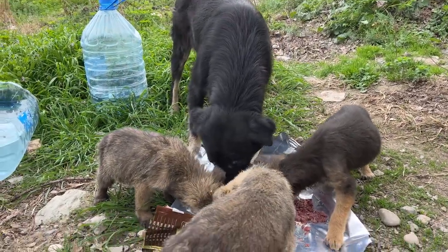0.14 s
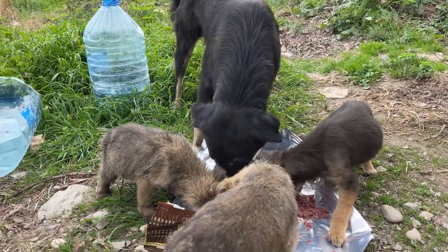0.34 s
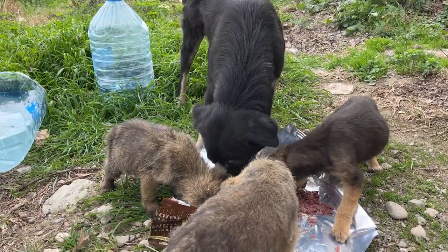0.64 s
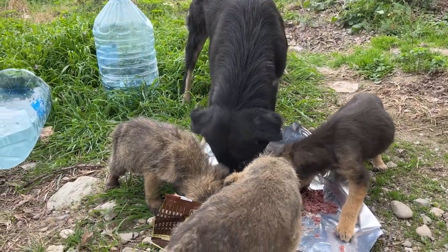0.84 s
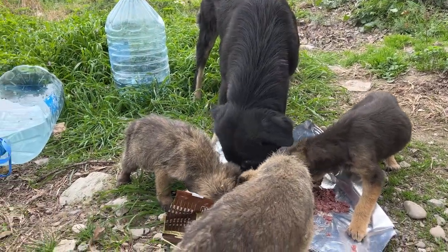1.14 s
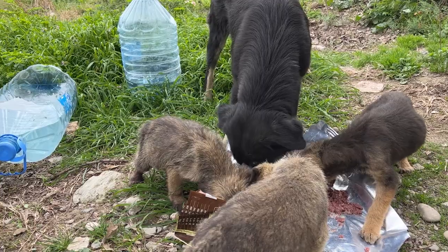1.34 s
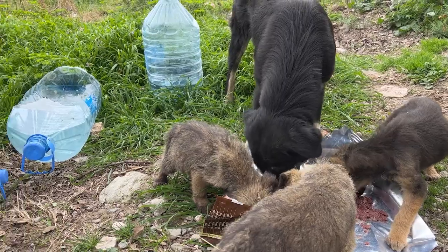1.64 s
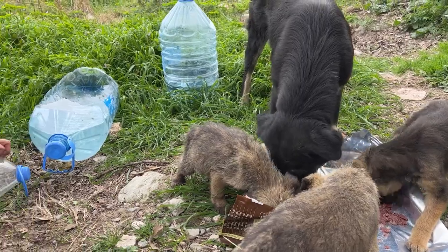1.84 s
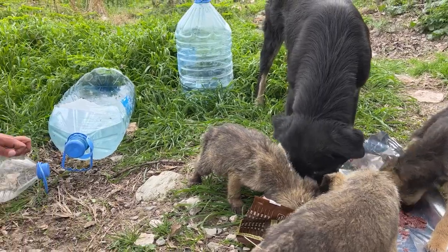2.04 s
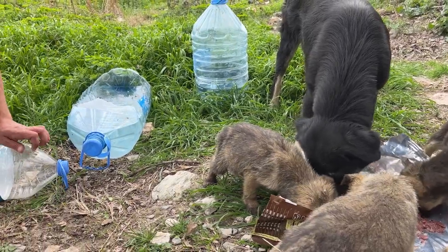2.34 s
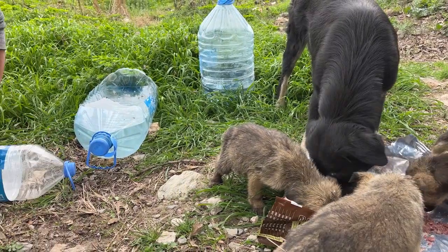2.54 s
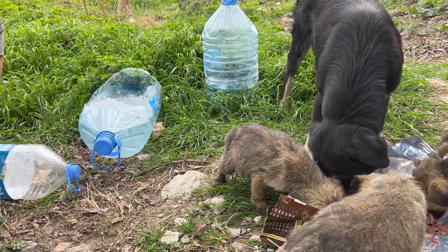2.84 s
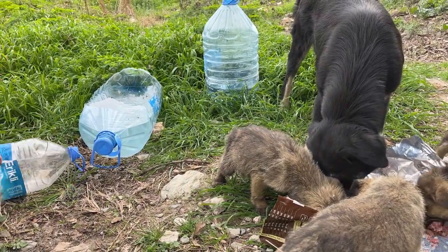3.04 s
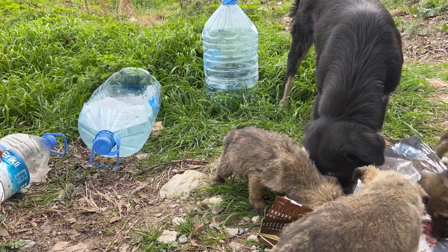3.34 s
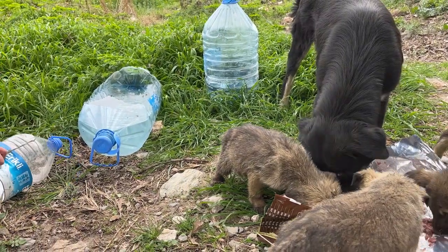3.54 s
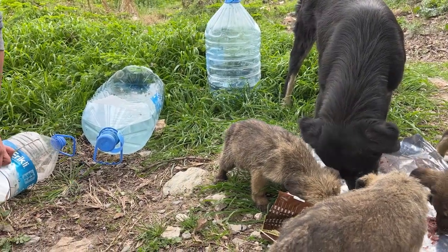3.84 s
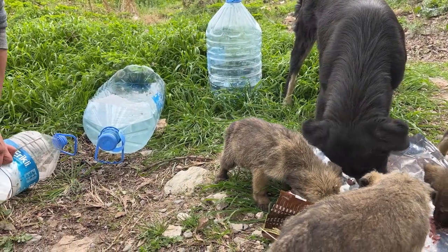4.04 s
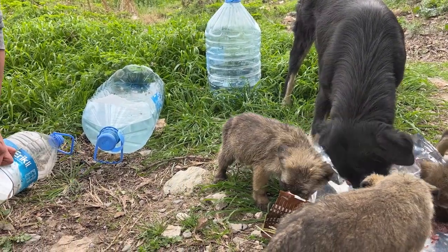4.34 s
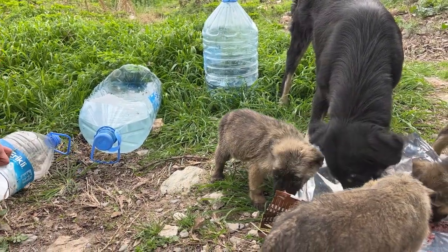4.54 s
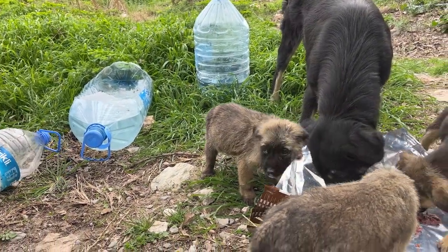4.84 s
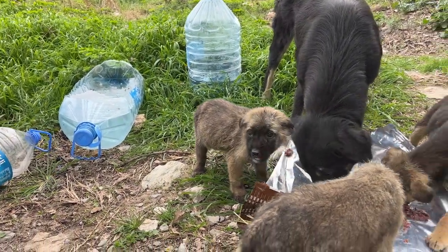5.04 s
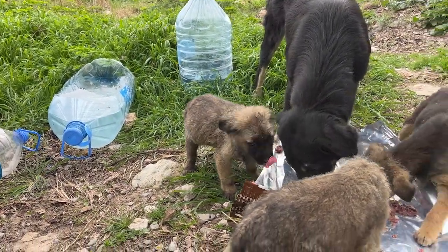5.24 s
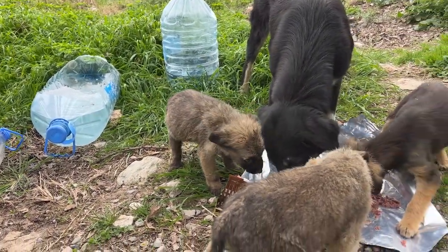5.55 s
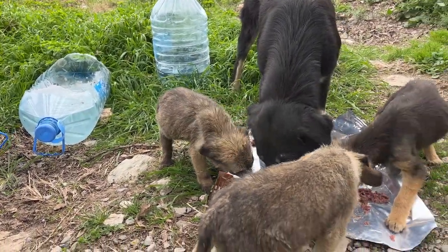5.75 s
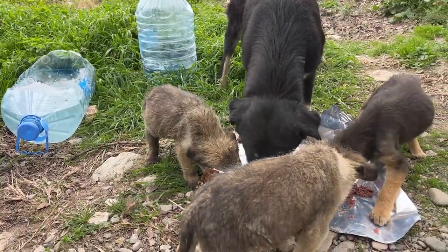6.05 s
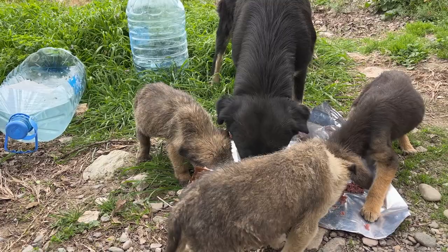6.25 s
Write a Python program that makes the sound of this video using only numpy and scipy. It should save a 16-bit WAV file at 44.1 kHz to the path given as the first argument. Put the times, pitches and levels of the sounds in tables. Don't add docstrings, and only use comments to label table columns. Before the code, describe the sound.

Puppies eat wet food off stiff plastic bags outdoors, heard close and dry in stereo. A short scrape and knock open the scene, then a strong thud with a crack at 0.1 s. Bright plastic snaps with hollow, downward-sliding pops follow around 0.25, 0.5 and 0.7 s, with a faint thin squeak near 0.6. From 1.0 to 2.2 s it is busiest: rapid cracks, jaw claps, licks and rustling, with an especially loud snap at 1.3. Wet smacks and small rising bubbles come at 2.5 to 2.9, then sharp cracks at 3.0, 3.2, 3.6 and 3.8. A quieter gap leads to a pop at 4.3 and a rough scrape with a deep thud around 4.5. Smacks and a crisp tick fall near 4.8, gulps at 5.2 and 5.4, a heavy wet smack at 5.8, and a bright snap at 6.3. Soft hiss, muffled chewing and light gusting wind continue underneath.

```python
import sys
import numpy as np
from scipy import signal
from scipy.fft import rfft, irfft
from scipy.io import wavfile
from scipy.ndimage import uniform_filter1d

SR = 44100
rng = np.random.default_rng(int(sys.argv[2]) if len(sys.argv) > 2 else 0)


def level_to_linear(level):
    exponent = np.asarray(level, float) / 20
    return 10 ** exponent


def int16_out(signal):
    q = np.round(np.clip(np.atleast_2d(signal).T, -1, 1) * 32767)
    wavfile.write(sys.argv[1], SR, q.astype(np.int16))


N = 282240
HZ = np.fft.rfftfreq(N, 1 / SR)
T = np.arange(N) / SR
COARSE = T[::64]

# (frequency [Hz], level [dB])
HISS_SPECTRUM = [(6200, -12), (8300, -17), (9700, -3), (11300, 0), (13000, -4), (14100, -9), (15000, -36)]


def shape(table):
    hz, value = np.transpose(table)
    return np.interp(np.log(HZ + 1), np.log(hz), value)


def colour(x, table):
    return irfft(rfft(x) * level_to_linear(shape(table)), N)


def unit(x):
    return x / np.sqrt(np.mean(x ** 2))


def noise(table):
    return unit(colour(rng.standard_normal((2, N)), table))


def walk(rate):
    hold = int(SR / rate)
    levels = np.repeat(rng.standard_normal(N // hold + 1), hold)
    return 2.1 * uniform_filter1d(uniform_filter1d(levels, hold), hold)[:N]


def add(out, s, x):
    i = int(s * SR)
    out[..., i:i + x.shape[-1]] += x[..., :out.shape[-1] - i]


def ring(x, hz, width_hz):
    return signal.lfilter(*signal.iirpeak(hz, hz / width_hz, fs=SR), x)


def ticks(rate, spread_db, fade_s):
    hits = (rng.random(N) < rate / SR) * level_to_linear(spread_db * rng.exponential(size=N))
    return signal.lfilter([1], [1, -np.exp(-1 / (fade_s * SR))], hits)


def burst(carrier, fade):
    t = T[:carrier.shape[-1]]
    early = np.exp(-t * fade)
    late = level_to_linear(-21.0) * np.exp(-t * fade / 2.86)
    scatter = level_to_linear(-27.0) * np.exp(-t / 0.017)
    x = carrier * (1 - np.exp(-t / 0.00048)) * (early + late + scatter)
    return x / abs(x).max()


def wind():
    # (frequency [Hz], level [dB])
    wind_spectrum = [(25, -55), (38, -10), (50, 5.5), (65, 1), (100, -5), (160, -9.5), (230, -13),
                     (350, -96)]
    # (time [s], level above the breeze [dB])
    gust_events = [(0.02, 6.5), (0.15, 10), (0.6, -4), (1.05, 1), (1.69, -4), (2.97, 0.5), (3.8, -1),
                   (4.29, 11), (4.579, 13.5), (5.25, 3), (5.7, 6), (6.4, 2)]
    breeze_db, rise_s, fall_s = -38, 0.025, 0.062
    gust_db = np.zeros(len(COARSE))
    for s, over_db in gust_events:
        approach = np.where(COARSE < s, (COARSE - s) / rise_s, (s - COARSE) / fall_s)
        gust_db += over_db * np.exp(approach)
    wind_db = np.interp(T, COARSE, breeze_db + gust_db)
    return noise(wind_spectrum) * level_to_linear(wind_db + 1.1 * walk(16))


def stirs():
    # (time [s], length [s], level added to the fine hiss [dB])
    stir_events = [(0.098, .06, 2), (0.265, .14, 4), (0.648, 0.13, 6), (0.844, 0.046, 25),
                   (1.244, 0.19, 12), (1.48, .08, 8), (1.72, 0.19, 12), (1.94, .12, -11), (2.202, 0.34, 10),
                   (1.998, .06, -7), (2.422, 0.18, -9), (2.566, .1, -3), (2.907, 0.99, 20.5),
                   (4.464, 0.069, -11), (5.513, 0.045, -14), (3.272, 0.12, -9), (3.415, 0.089, 5),
                   (3.63, 0.11, -13), (3.952, 0.35, 17.5), (3.99, .12, 12), (4.383, 0.091, 21),
                   (4.511, 0.027, 36), (4.626, 0.044, 17), (4.96, 0.14, 18.5), (5.164, .08, 0),
                   (5.332, 0.41, 12), (5.63, 0.12, 10), (5.8, .08, 15), (5.94, 0.072, 14), (6.167, 0.11, 5),
                   (6.273, 0.11, 12)]
    swell_db = sum(db * np.exp(-((COARSE - s) / (length / 2)) ** 4) for s, length, db in stir_events)
    return np.interp(T, COARSE, swell_db)


def fine_hiss(rustle_db, stir_db, shared_db):
    calm_db, level_db, slope = -54, -80, 0.3
    hiss_db = level_db + slope * (rustle_db - calm_db) + stir_db
    grains = 0.8 * ticks(rate=40, spread_db=1.5, fade_s=0.001)
    return noise(HISS_SPECTRUM) * (level_to_linear(0.8 * shared_db + 1.6 * walk(12)) + grains) * level_to_linear(hiss_db)


def rustle(dull, crisp, rustle_db, stir_db, shared_db):
    wet = dull * (1 + 0.8 * ticks(rate=70, spread_db=2.6, fade_s=0.004))
    dry_grains = 1 + 0.6 * ticks(rate=50, spread_db=2.6, fade_s=0.002)
    dry_film = crisp * level_to_linear(-5.5 + 0.32 * stir_db + 1.2 * walk(20)) * dry_grains
    return (wet + dry_film) * level_to_linear(rustle_db + shared_db - 3.0)


def squelches(effort_db):
    pocket_hz = (527, 760, 1150, 2300, 4500)
    level_db, middling_db, slope = -58.5, -42, 1.6
    pockets = (ring(ticks(rate=30, spread_db=1.7, fade_s=0.0004), hz, 0.22 * hz) for hz in pocket_hz)
    return unit(sum(pockets)) * level_to_linear(level_db + slope * (effort_db - middling_db))


def chewing(chew_db, shared_db):
    # (frequency [Hz], level [dB])
    chew_spectrum = [(90, -58), (150, 0.5), (280, 11.5), (420, 4), (600, -5.5), (900, 1), (1300, -7.5),
                     (2000, -29.5)]
    lumps = noise(chew_spectrum) * level_to_linear(chew_db + shared_db + 1.4 * walk(40))
    return lumps + squelches(chew_db)


def bed(dull, crisp):
    # (time [s], jostling of the bags [dB], chewing effort [dB])
    pack_effort = [(0.0, -53.5, -48), (0.28, -57.5, -49), (1.05, -51.5, -47.5), (1.16, -42, -36),
                   (1.34, -54.5, -43), (1.55, -55, -46.5), (1.69, -52, -43), (1.84, -43, -66),
                   (2.07, -62, -34), (2.19, -43.5, -38), (2.33, -58.5, -45), (2.73, -51.5, -41.5),
                   (2.97, -50.5, -43), (3.8, -56, -49), (4.24, -54, -46.5), (4.4, -53.5, -42),
                   (5.06, -51, -46), (6.4, -51.5, -46)]
    s, *columns = np.transpose(pack_effort)
    rustle_db, chew_db = (np.interp(T, s, column) for column in columns)
    stir_db = stirs()
    shared_db = 1.1 * walk(30)
    bags = rustle(dull, crisp, rustle_db, stir_db, shared_db)
    return bags + fine_hiss(rustle_db, stir_db, shared_db) + chewing(chew_db, shared_db) + wind()


def squeaks():
    # (time [s], length [s], frequency [Hz], level [dB])
    squeak_events = [
        (.59, .09, 5560, -58),
        (.658, .022, 7300, -60),
    ]
    out = np.zeros(N)
    for s, length, hz, db in squeak_events:
        t = T[:int(length * SR)]
        add(out, s, level_to_linear(db) * np.sin(2 * np.pi * hz * t) * np.sqrt(np.sin(np.pi * t / length)))
    return out * level_to_linear(1.5 * walk(160))


def scrapes(sheet, sizzle):
    # (time [s], length [s], rms level [dB], sizzle [dB])
    scrape_events = [(0.009, 0.01, -23, -20), (0.206, 0.062, -46, -20), (0.311, 0.021, -35, -15),
                     (1.457, 0.082, -46.5, -12), (1.79, 0.077, -51, -23), (2.058, 0.07, -43.5, -19),
                     (2.183, 0.048, -37, -21), (3.366, 0.051, -47, -6), (4.413, 0.013, -29, -19),
                     (4.497, 0.036, -34, -21), (4.56, 0.033, -21.5, -20), (4.597, 0.011, -24, -20),
                     (2.531, 0.031, -45.5, -12), (2.817, 0.021, -42.5, -9), (4.801, 0.07, -34.5, -10),
                     (5.366, 0.1, -49, -29), (6.241, 0.11, -46.5, -15)]
    # (frequency [Hz], width [Hz], level [dB])
    fold_modes = [
        (1303, 130, 3.5),
        (2140, 140, -3.5),
        (2740, 165, 3.5),
        (3650, 200, -5),
        (4550, 200, 1),
        (5020, 370, 2.5),
    ]
    body, top = np.zeros(N), np.zeros(N)
    for s, length, db, top_db in scrape_events:
        onset = np.minimum(T[:int(length * SR)] / 0.004, 1)
        settling = np.exp(-T[:4000] / 0.003)
        slide = np.r_[onset, settling]
        add(body, s, level_to_linear(db) * slide)
        add(top, s, level_to_linear(db + top_db) * slide)
    modes = sum(level_to_linear(db) * ring(sheet, hz, width) for hz, width, db in fold_modes)
    folds = unit(0.25 * sheet + modes)
    return (body * folds + top * sizzle) * level_to_linear(1.5 * walk(600) + 1.2 * walk(60))


def bubbles():
    # (time [s], peak [dB], final pitch [Hz], cycles until silent [1])
    bubble_events = [
        (2.705, -24, 1330, 85),
        (2.705, -33, 2600, 60),
        (2.903, -28, 1270, 45),
        (1.201, -29, 2500, 110),
        (5.368, -42, 2500, 140),
        (2.869, -25, 800, 30),
    ]
    rise, rise_s = 0.42, 0.004
    out, t = np.zeros(N), T[:3000]
    for s, db, hz, ring_cycles in bubble_events:
        cycles = hz * (t - rise * rise_s * (1 - np.exp(-t / rise_s)))
        envelope = np.exp(-np.log(1000) * t * hz / ring_cycles) * (1 - np.exp(-t / 0.0006))
        add(out, s, level_to_linear(db) * np.sin(2 * np.pi * cycles) * envelope)
    return out * level_to_linear(2.0 * walk(300))


def pops(lump):
    # (time [s], peak [dB], pitch [Hz], cycles until silent [1])
    thud_events = [
        (0.0945, -9, 395, 6.5),
        (1.766, -16, 420, 4.5),
        (4.566, -24, 75, 3.5),
        (1.696, -19.5, 273, 11.4),
        (0.1, -22, 176, 3.8),
        (0.133, -54, 79, 8.2),
        (1.701, -34.5, 112, 8.6),
        (4.272, -39, 105, 68),
        (4.557, -22.5, 59, 2.6),
    ]
    # (time [s], peak [dB], pitch [Hz])
    gulp_events = [(0.303, -20, 200), (0.537, -24, 181), (1.002, -24, 233), (1.067, -34.5, 195),
                   (1.202, -23, 196), (1.254, -17, 265), (1.362, -29, 217), (1.476, -27.5, 230),
                   (1.522, -32.5, 174), (1.5975, -20, 264), (1.766, -14.5, 275), (1.872, -25.5, 246),
                   (2.024, -19, 267), (2.186, -22.5, 379), (2.901, -40, 173), (3.172, -17.5, 290),
                   (3.239, -36, 247), (3.599, -30, 251), (3.798, -31.5, 248), (5.195, -30, 202),
                   (5.782, -14, 293), (0.681, -18.5, 692), (2.871, -27, 730), (5.88, -34, 327),
                   (6.138, -35, 358), (5.657, -39, 296)]
    # (time [s], peak [dB], pitch [Hz])
    hollow_events = [(0.004, -17, 676), (0.244, -24, 344), (0.267, -30.5, 410), (0.522, -22.5, 199.5),
                     (0.678, -33, 285), (1.166, -27.5, 435), (1.66, -18.5, 269), (1.792, -22.5, 318),
                     (1.816, -29.5, 225), (1.909, -32.5, 330), (2.202, -19.5, 275), (2.238, -27, 265),
                     (2.527, -31.5, 247), (2.629, -21.5, 259), (2.869, -24, 262), (3.004, -28, 314),
                     (3.024, -20.5, 278), (3.081, -24, 355), (3.381, -22.5, 241), (4.336, -21.5, 296),
                     (4.393, -25, 236), (4.821, -22.5, 222), (5.033, -33, 744), (5.325, -25, 381),
                     (5.394, -33, 380), (5.43, -28, 388), (5.749, -28.5, 206), (6.273, -26.5, 400)]
    # (time [s], peak [dB], pitch
    # [Hz])
    wet_blip_events = [(.427, -44, 732), (0.512, -39, 1450), (.524, -18, 565), (.575, -39, 4000),
                       (.612, -39, 4060), (.705, -56, 1700), (1.109, -37, 635), (1.143, -31, 706),
                       (1.889, -39, 2980), (1.896, -45, 3480), (1.92, -32, 770), (2.219, -39, 710),
                       (2.318, -35, 796), (2.562, -43, 2480), (2.578, -38, 1150), (1.738, -48, 3500),
                       (1.663, -55, 2300), (2.821, -39, 840), (2.861, -25.5, 514), (3.171, -28, 780),
                       (3.787, -36, 2600), (4.079, -49, 689), (4.42, -32, 736), (4.441, -39, 1012),
                       (4.635, -54, 760), (4.878, -35, 780), (4.957, -38.5, 818), (4.98, -39, 2500),
                       (5.039, -28.5, 890), (5.415, -37, 810), (5.648, -47, 825), (5.732, -40, 2090),
                       (5.748, -23, 1960), (6.284, -33, 2630), (1.813, -40, 1900), (1.827, -35, 900),
                       (1.835, -38, 2600), (1.876, -57, 4200), (1.209, -40, 2500), (2.206, -31, 2300),
                       (2.314, -49, 2500), (5.388, -45, 1010), (5.485, -44, 3000), (5.585, -54, 3500),
                       (.686, -25.5, 230), (1.02, -38, 500), (1.313, -24, 260), (1.526, -38, 500),
                    (1.838, -32, 480), (1.953, -30.5, 520), (2.077, -30.5, 250), (2.261, -35, 500),
                    (2.561, -34, 480), (2.662, -33, 450), (2.755, -37, 480), (2.897, -32, 494),
                    (3.051, -29, 330), (3.416, -36, 500), (4.443, -41, 516), (5.731, -37, 503),
                    (1.25, -26, 1000), (2.844, -38, 950), (3.24, -29, 850), (3.368, -31, 950),
                    (5.323, -32, 910), (5.378, -40, 900), (5.446, -37, 950), (1.532, -42, 2200),
                    (4.636, -43, 2200), (4.794, -42, 2200), (5.007, -40, 2200), (6.274, -31, 2200),
                    (1.032, -39, 4000), (1.062, -42, 4200), (2.042, -19.5, 4150), (2.638, -38, 4670),
                    (4.727, -41, 4200), (1.196, -38, 2200), (4.391, -31, 2500), (.078, -44, 950),
                    (1.6945, -24, 750), (1.66, -29, 580), (1.7655, -21, 800), (1.827, -28, 720),
                    (1.593, -25, 800), (4.335, -14, 1120), (1.851, -28, 1050), (1.92, -33, 900),
                    (1.868, -33, 4200), (1.79, -32, 4200), (5.74, -33, 560), (3.017, -30, 540),
                    (3.034, -30, 520), (3.8, -28, 2800), (4.414, -34, 2700), (2.826, -36, 2500),
                    (1.168, -22, 4300), (.009, -24, 330), (2.069, -36, 1150), (5.426, -29, 1050)]
    squeeze, squeeze_cycles = 0.5, 0.92
    thud_mess, bite_mess = 0.3, 0.95
    kinds = ((gulp_events, 12), (hollow_events, 20.2), (wet_blip_events, 10.1))
    rows = [(*row, thud_mess) for row in thud_events]
    rows += [(*row, count, bite_mess) for table, count in kinds for row in table]
    out, wobble = np.zeros(N), level_to_linear(2.5 * walk(170))
    for s, db, hz, ring_cycles, mess in rows:
        life = np.clip(ring_cycles, 3, 60) / hz
        t = T[:min(int(2 * life * SR), 8000)]
        i = min(int(s * SR), N - len(t))
        age = t / life
        cycles = hz * t + squeeze * squeeze_cycles * (1 - np.exp(-t * hz / squeeze_cycles))
        fade = np.exp(-np.log(1000) * age ** 1.4)
        pocket = np.sin(2 * np.pi * cycles) * fade * wobble[i:i + len(t)]
        shake = lump[i:i + len(t)] * np.exp(-4.2 * age)
        mass = 1.6 * ring(shake, 0.75 * hz, 0.35 * hz)
        mass += 1.1 * ring(shake * np.exp(-5.0 * age), 1.9 * hz, 0.7 * hz)
        onset = 1 - np.exp(-t * hz / 0.55)
        pop = (pocket + mess * mass / abs(mass).max()) * onset
        add(out, s, level_to_linear(db + 7.0) * pop / abs(pop).max())
    return out


def creases(sizzle):
    # (time [s], peak [dB])
    tick_events = [(0.2279, -43), (.525, -27), (.839, -46), (1.064, -42), (1.124, -42), (1.66, -41),
                   (1.738, -47), (2.282, -44), (3.033, -36), (3.788, -37), (0.371, -41), (1.154, -26),
                   (1.1817, -27), (1.3536, -29), (1.4566, -31), (1.503, -34), (1.5326, -37), (1.5653, -46),
                   (2.474, -41), (2.655, -30), (2.679, -32.5), (2.7247, -35), (2.762, -28.5), (1.128, -33),
                   (1.471, -35), (1.768, -23), (2.205, -32), (3.058, -32), (3.475, -39), (4.584, -25),
                   (4.835, -14), (5.732, -40), (6.069, -56), (6.075, -52), (6.22, -46), (4.7246, -38),
                   (4.762, -39), (4.9374, -50), (5.8084, -40)]
    out, thin = np.zeros((2, N)), colour(sizzle, HISS_SPECTRUM)
    for s, db in tick_events:
        grain = thin[:, int(s * SR):][:, :1500]
        add(out, s - 0.0004, level_to_linear(db - 3.5) * burst(grain, 790.0))
    return out


def cracks(dull, crisp, sizzle):
    # (time [s], peak [dB], ring [Hz], brightness [dB])
    snap_events = [(0.0148, -18, 2100, -37), (0.0946, -9.5, 1940, -16), (0.2432, -10.5, 2240, -7),
                   (0.2655, -24, 3380, -24), (0.5231, -9.5, 1900, -23), (0.6819, -5, 1740, 0.5),
                   (0.9967, -6, 2100, -3), (1.1441, -25, 2700, -2), (1.1675, -8, 1640, -5.5),
                   (1.2331, -11, 4150, 3.5), (1.2505, -11, 2140, -51.5), (1.3040, -0.5, 790, -9.5),
                   (1.4314, -8, 2500, -8), (1.5932, -7.5, 1710, -15.5), (1.6208, -11, 2660, -30),
                   (1.6286, -4.5, 2740, -10.5), (1.696, -20, 1070, -13.5), (1.8516, -14.5, 2110, -44),
                   (1.9073, -10, 830, -55), (1.9547, -25, 1010, -44), (2.0341, -14, 1680, -22),
                   (2.115, -9.5, 1670, -26), (2.5766, -7, 1150, -19), (2.867, -26, 2670, -22),
                   (3.0047, -3, 2670, -14), (3.0864, -25, 2040, -30), (3.1717, -12.5, 2500, -18.5),
                   (3.5976, -11, 2300, -11.5), (3.7992, -11.5, 2600, -13), (5.3892, -17, 1070, -48),
                   (5.4281, -27, 1080, -17)]
    # (time [s], peak [dB], ring [Hz], brightness [dB])
    buckle_events = [(0.0044, -12.5, 2280, -9), (0.302, -12, 1810, -11.5), (0.5373, -6.5, 2030, 1),
                     (1.2014, -20, 2370, -18), (1.3615, -14, 830, -33), (1.518, -25.5, 1180, -41),
                     (1.7655, -10.5, 956, -25), (1.8113, -27, 2610, -43), (1.8684, -22, 1670, -17),
                     (2.0098, -23, 1180, -59), (2.0404, -17.5, 2670, -18), (2.099, -26.5, 2560, -5),
                     (2.187, -45, 880, -20), (2.2407, -22, 4670, -3), (2.2561, -23, 2170, -12),
                     (2.828, -28, 2620, -43), (3.0194, -18, 2880, -14), (3.0684, -19.5, 1090, -40),
                     (3.2380, -14, 2270, -13.5), (3.3769, -19.5, 1820, -10), (4.333, -7, 2550, -18),
                     (4.8332, -15.5, 2460, -31), (4.8475, -28, 2340, 11.5), (5.1965, -13.5, 903, -34),
                     (5.874, -22.5, 1820, -25), (6.2905, -3.5, 2290, -3.5), (6.343, -22, 1730, -45)]
    # (time [s], peak [dB], ring [Hz], brightness [dB])
    smack_events = [(0.284, -26.5, 1960, -21), (1.4723, -21, 754, -46), (1.7892, -18.5, 1160, -14),
                    (1.8248, -20, 860, -45), (2.282, -28, 3600, -30), (2.3091, -29, 2380, -8.5),
                    (2.5257, -31, 902, -32), (2.5387, -23.5, 1070, -32), (2.626, -15.5, 1110, -29.5),
                    (2.705, -30, 1200, -30), (2.8993, -22.5, 1153, -31), (3.7708, -23, 1290, -11),
                    (4.37, -24, 1800, -37), (4.3887, -20.5, 930, -17), (4.803, -19, 1050, -48),
                    (4.817, -12.5, 1270, -13), (5.037, -24, 875, -30), (5.1168, -25, 3920, 8),
                    (5.3216, -26, 2130, -10), (5.4122, -17.5, 836, -20.5), (5.7315, -23, 1050, -18),
                    (5.7451, -15, 1920, -20), (5.7805, -6.5, 790, -22.5), (5.9517, -24.5, 3160, -6),
                    (6.1333, -33.5, 2130, -5)]
    kinds = ((snap_events, 0.014), (buckle_events, 0.031), (smack_events, 0.058))
    rows = [(*row, t60) for table, t60 in kinds for row in table]
    crisp_share = 0.52
    body_limit = signal.butter(4, 7500, fs=SR, output="sos")
    out, size = np.zeros((2, N)), 5000
    grit = level_to_linear(2.0 * walk(900))
    bounce_s = 0.0008 + 0.0018 * rng.random(len(rows))
    for (s, db, hz, top_db, t60), late in zip(rows, bounce_s):
        i = min(int(s * SR), N - size)
        low, mid, high = (layer[:, i:i + size] * grit[i:i + size] for layer in (dull, crisp, sizzle))
        fade = np.log(1000) / t60
        shake = burst(low, fade) + level_to_linear(crisp_share * top_db + 6.5) * burst(mid, 1.05 * fade)
        body = shake + 2.1 * ring(shake, hz, 0.28 * hz)
        add(body, late, 0.39 * body)
        body = signal.sosfilt(body_limit, body)
        top = level_to_linear(top_db - 1.5) * burst(high, 2.1 * fade)
        add(out, s - 0.0004, level_to_linear(db + 2.5) * (body / abs(body).max() + top))
    return out


def ports(sound, hollow):
    # (frequency [Hz], left minus right [dB])
    port_lean = [(70, 1.5), (260, -1.5), (600, 4), (1100, 5), (1480, -4), (2300, 0), (3400, 8), (5500, 6),
                 (6800, -3), (10500, 0)]
    # (frequency [Hz], phase by which the right port lags [rad])
    port_lag = [(0, 0), (220, .35), (430, 1.4), (950, 2.45), (1300, 2.3), (1550, 3.9), (2000, 4.9),
                (3300, 9.5), (3900, 12.4), (4650, 14.9), (6600, 18.8), (8000, 15.4), (12000, 12.0),
                (16500, 9.2)]
    # (frequency [Hz], share of the right port unrelated to the left [0-1])
    port_apart = [(40, 0.35), (110, 0.3), (200, 0.04), (900, 0.12), (2500, 0.35), (3600, 0.5), (7000, 0.6),
                  (8600, 0.3), (11200, 0.05)]
    first, other = rfft(sound)
    both = rfft(hollow)
    apart = shape(port_apart)
    lean = level_to_linear(shape(port_lean) / 2)
    lag = np.exp(-1j * np.interp(HZ, *np.transpose(port_lag)))
    left = (first + both) * lean
    right = (np.sqrt(1 - apart) * first + np.sqrt(apart) * other + both) * lag / lean
    return irfft(np.array([left, right]), N)


def scene():
    # (frequency [Hz], level [dB])
    dull_spectrum = [(400, -3), (750, -3.5), (1100, -3), (1450, -2), (2500, -9), (3100, -16.5),
                     (4000, -48.5)]
    crisp_spectrum = [(2200, -5.5), (3100, -2.5), (4500, 1.5), (5800, -7.5), (7200, -12.5), (9000, -16)]
    sizzle_spectrum = [(6500, 0), (8000, 4), (9500, 5), (11500, 3.5), (13500, -3), (15000, -4),
                       (16500, -47)]
    # (frequency [Hz], level [dB])
    soft_spectrum = [(1100, 0), (4000, -40)]
    dull, crisp, sizzle = noise(dull_spectrum), noise(crisp_spectrum), noise(sizzle_spectrum)
    bags = bed(dull, crisp) + scrapes(dull + 0.42 * crisp, sizzle)
    bags += creases(sizzle) + cracks(dull, crisp, sizzle)
    mouths = squeaks() + bubbles() + pops(noise(soft_spectrum)[0])
    return ports(bags, mouths)


def roll_off(x):
    return signal.sosfilt(signal.butter(12, 16840, fs=SR, output="sos"), x)


def record(dry):
    thin = signal.sosfilt(signal.butter(2, 39.2, "high", fs=SR, output="sos"), dry)
    rounded = 1.08 * np.tanh(thin / 1.08)
    mix = signal.sosfilt(signal.ellip(8, 0.3, 60, 16480, fs=SR, output="sos"), rounded)
    return roll_off(mix)


dry = scene()
out = record(dry)
int16_out(out)
```